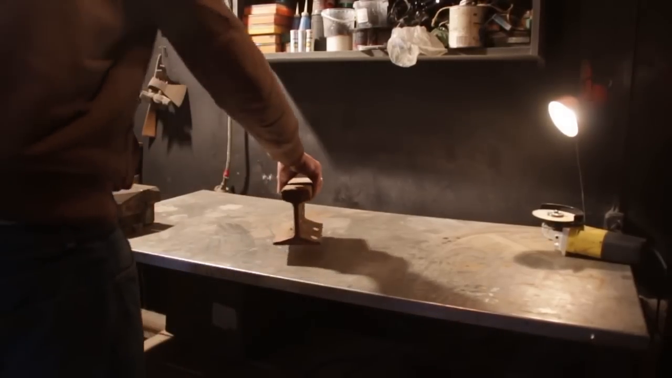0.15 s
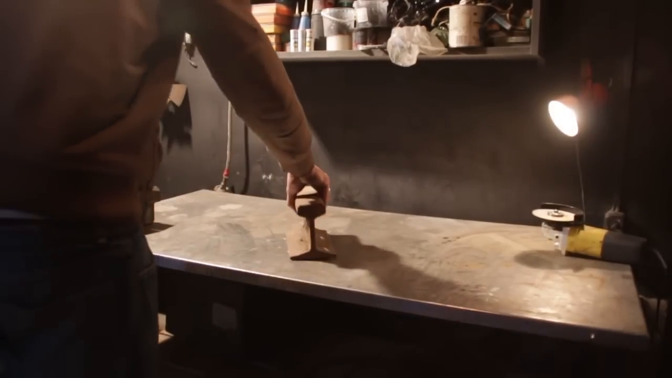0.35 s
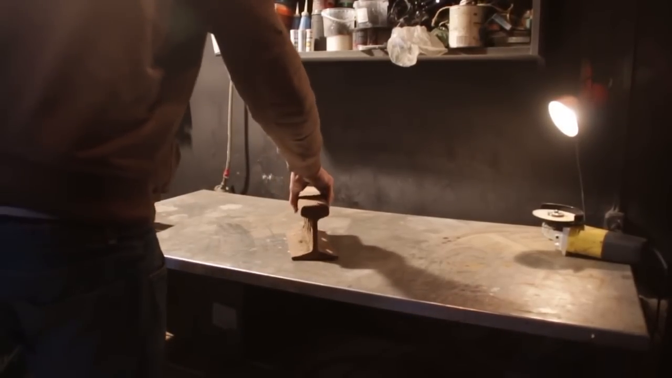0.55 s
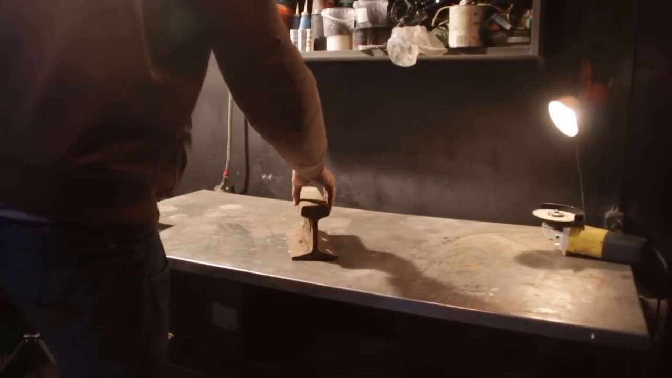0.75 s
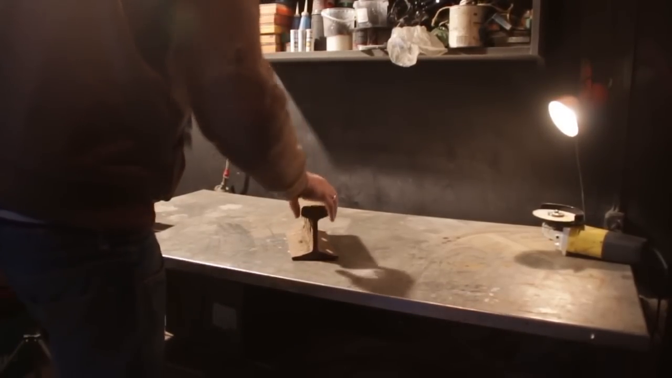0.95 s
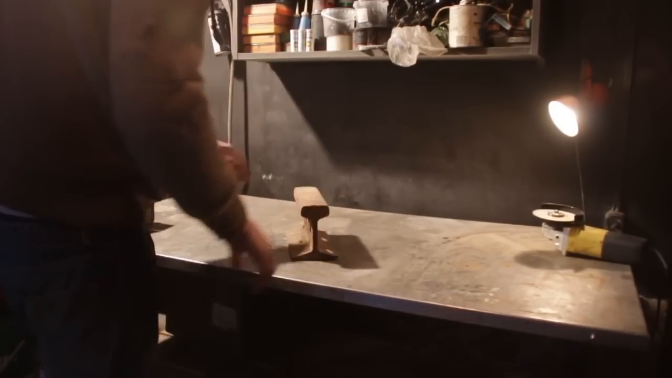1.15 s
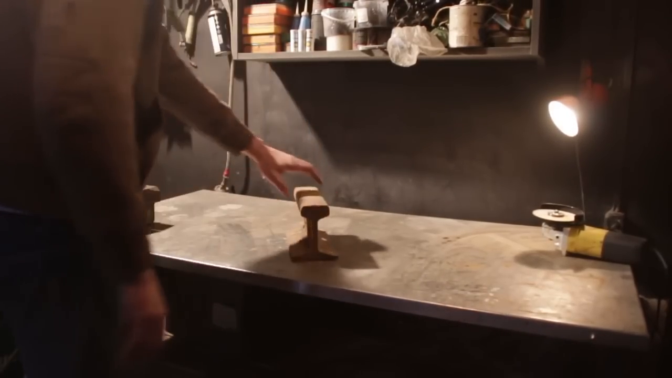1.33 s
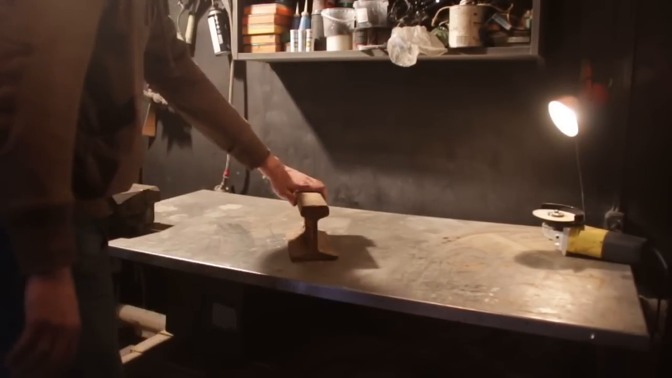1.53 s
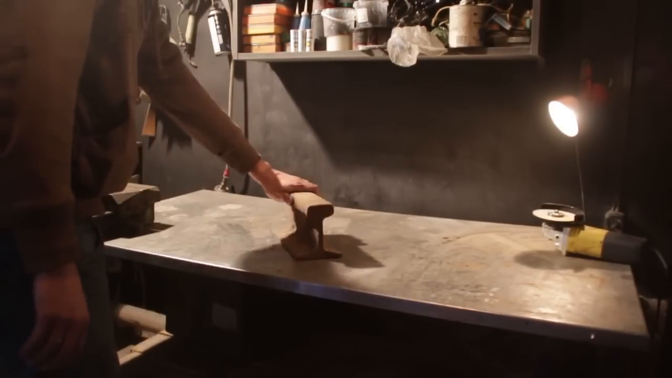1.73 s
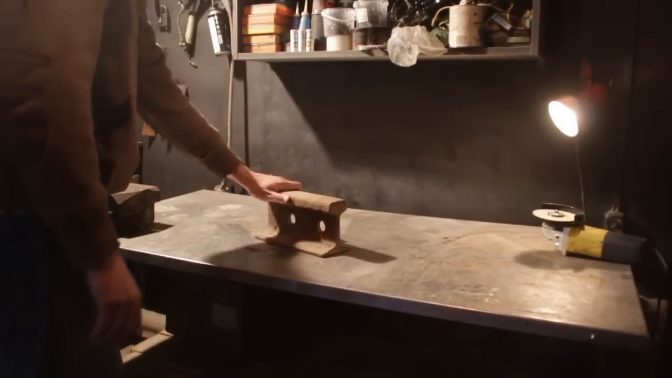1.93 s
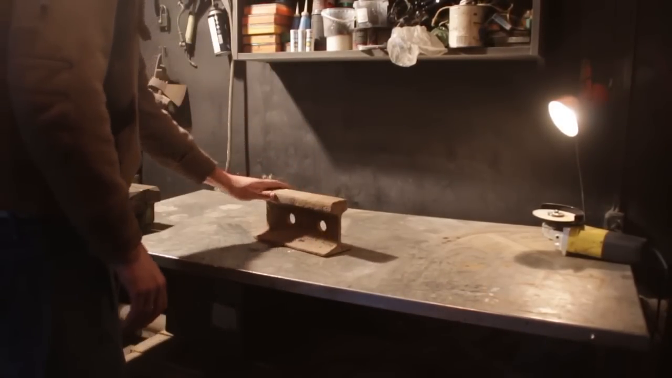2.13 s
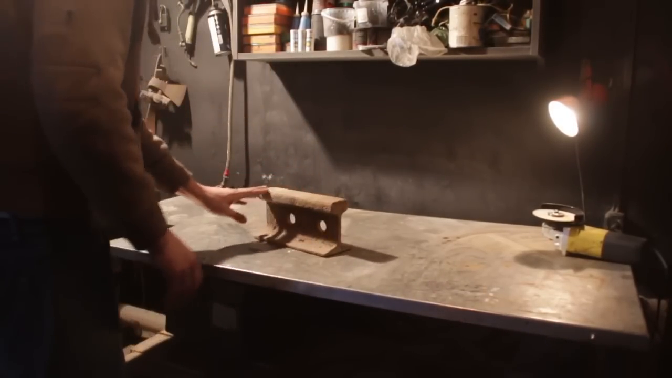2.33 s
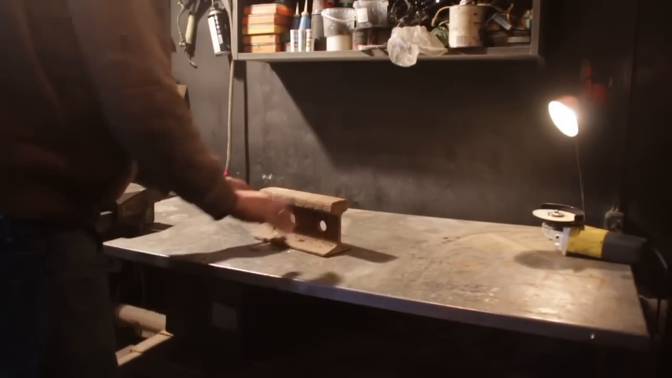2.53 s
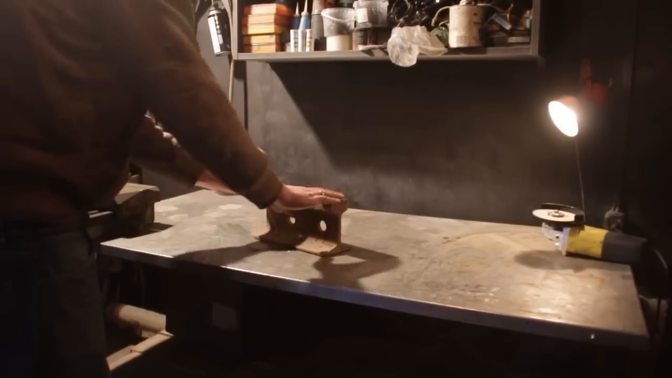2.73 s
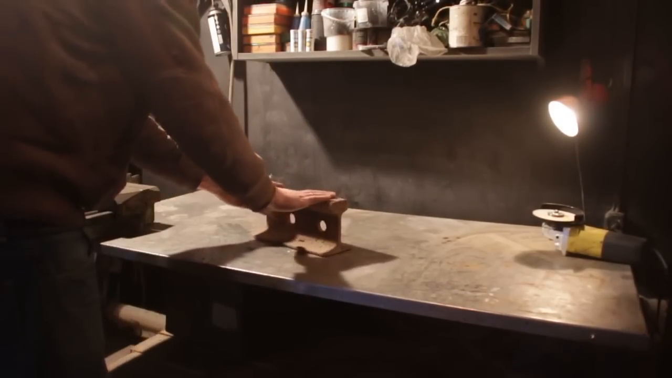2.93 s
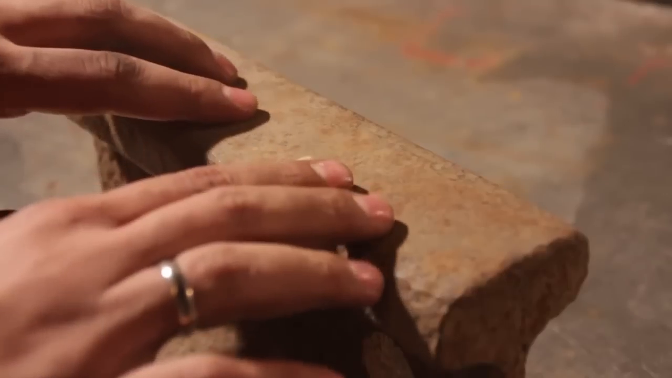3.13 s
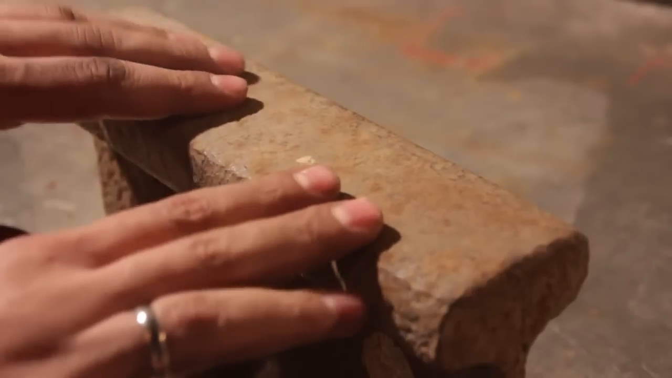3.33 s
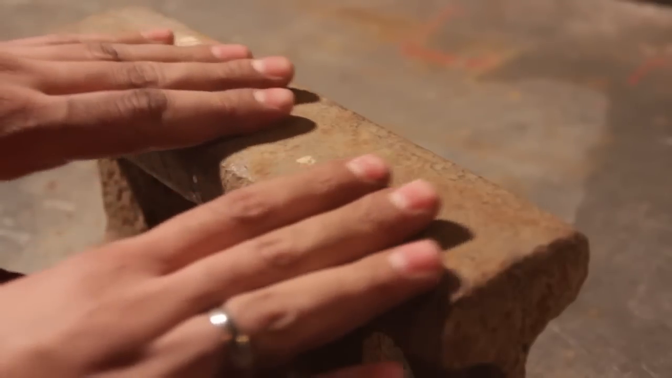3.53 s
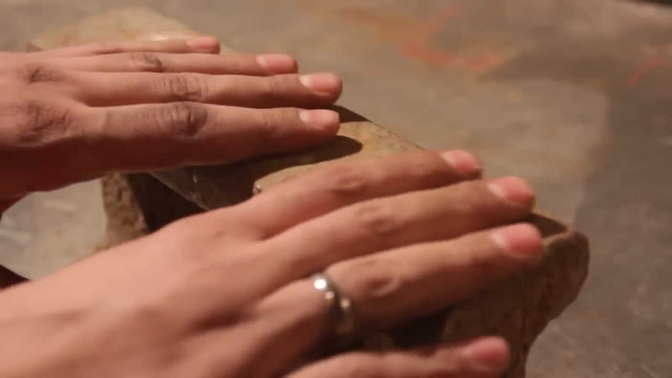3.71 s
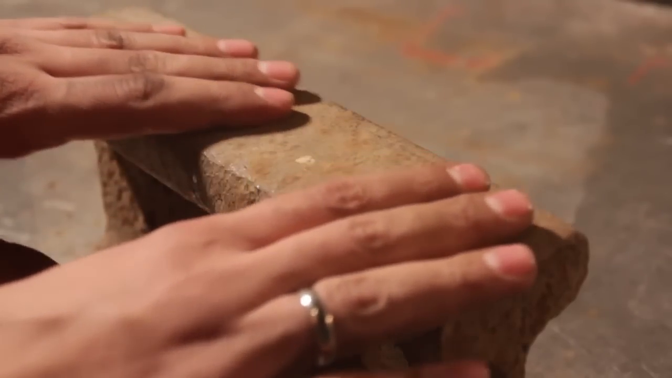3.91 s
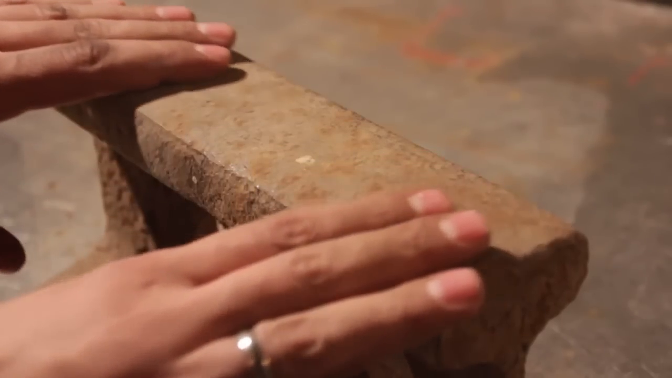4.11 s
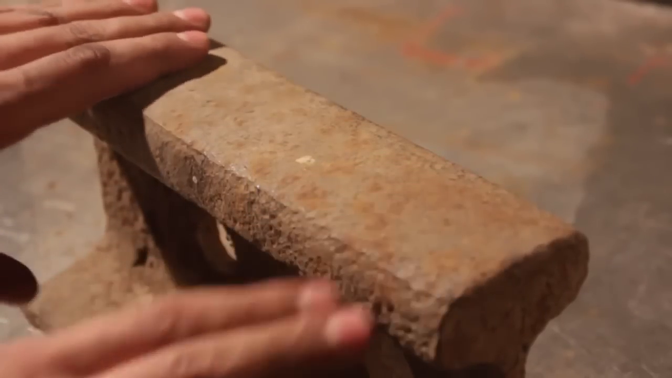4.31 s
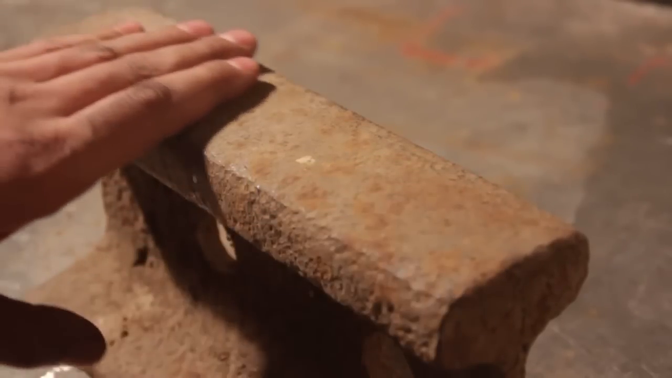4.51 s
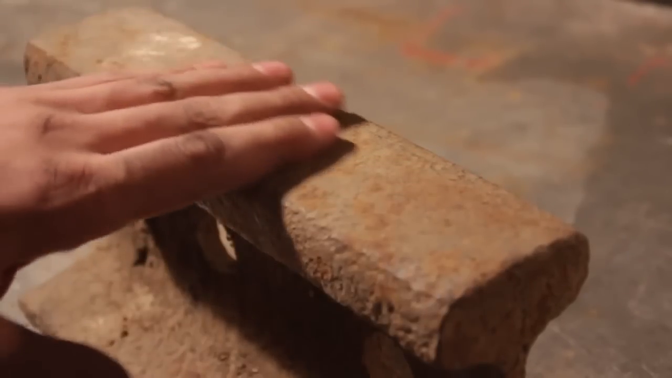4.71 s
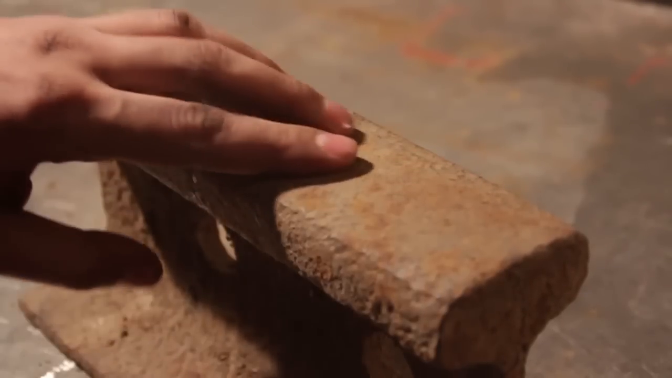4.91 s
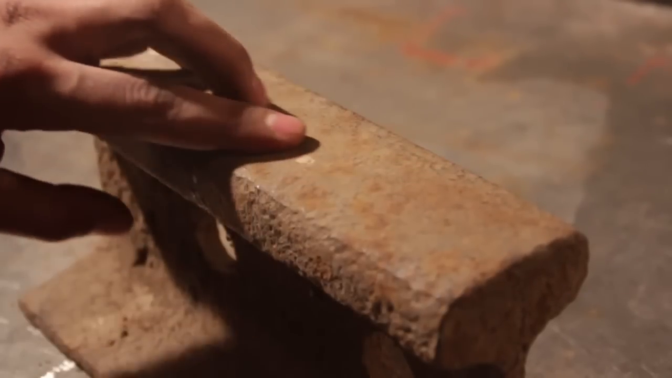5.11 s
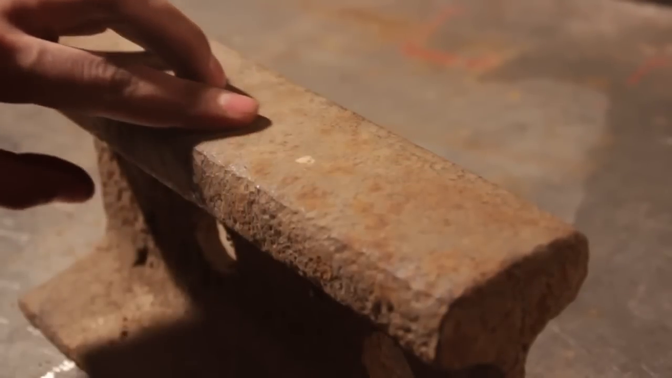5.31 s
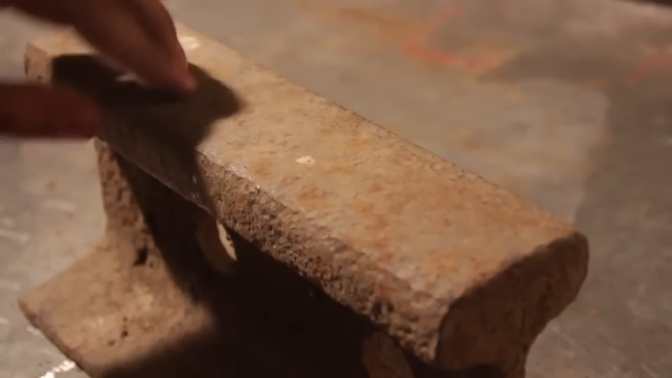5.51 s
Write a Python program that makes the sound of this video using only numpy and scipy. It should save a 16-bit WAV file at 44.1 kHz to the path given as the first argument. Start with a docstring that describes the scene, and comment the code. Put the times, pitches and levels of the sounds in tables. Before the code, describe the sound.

A heavy piece of steel rail scuffs and clangs onto a steel bench, rocks still, grinds round with a second clank, then palms brush its rusty top.

```python
"""Steel rail on a workbench

In a small workshop, a short length of rail scuffs a steel bench, drops with a clang and rocks to rest.
It is then turned round, grinding and knocking; afterwards two hands stroke its rusty head.
Blows and tiny friction contacts set off the ring of the bench. Short bands of noise, narrow or wide,
add chirps, groans, brushing rasps and faint rail ring. Palms hiss as shaped noise and make the rail sing
faintly. Sleeves and workshop air are steady soft noise.
"""
import sys
import numpy as np
from scipy import signal
from scipy.io import wavfile

SR = 44100
rng = np.random.default_rng(int(sys.argv[2]) if len(sys.argv) > 2 else 0)


def master_out(mix):
    """Clip the mix to full scale and print it as 16-bit PCM to the path in sys.argv[1]."""
    frames = np.transpose(np.atleast_2d(mix))
    ceiling = np.clip(frames, -1, 1)
    pcm = np.round(ceiling * 32767).astype(np.int16)
    wavfile.write(sys.argv[1], SR, pcm)


N = 244755
TIME = np.arange(N) / SR
RING_TIME = TIME[:3 * SR // 2]  # every ring is computed for 1.5 s
TURN_S = 1.5  # the hand takes hold of the rail to turn it


def from_db(db):
    """Turn decibels into gain."""
    return 10 ** (np.asarray(db) / 20)


def unit_rms(x):
    """Scale to an rms (average strength) of 1."""
    return x / np.sqrt(np.mean(x ** 2) + 1e-20)


def unit_energy(x):
    """Scale a response so that it keeps the power of white noise."""
    return unit_rms(x) / np.sqrt(x.shape[-1])


def at_hz(points, hz):
    """Read a table between its rows, on a log-frequency axis."""
    points = np.array(points)
    return np.interp(np.log(hz), np.log(points[:, 0]), points[:, 1])


def band(x, edges_hz, kind, order=2):
    """Keep part of the frequency range with a Butterworth filter."""
    sections = signal.butter(order, edges_hz, kind, fs=SR, output="sos")
    return signal.sosfilt(sections, x)


def convolve(force, response):
    """Let a force play through a stereo response."""
    return signal.fftconvolve(force[None], response, axes=1)[:, :N]


def stereo(mid, side, alike):
    """Mix two independent signals into two channels with the given correlation."""
    alike = np.clip(alike, -.99, .99)
    return np.sqrt(1 + alike) * mid + np.sqrt(1 - alike) * side * [[1], [-1]]


def noise_bands(spectrum, likeness, size):
    """Split stereo noise into third-octave bands, each given as (Hz, samples, gain)."""
    edges = 25 * 2 ** (np.arange(29) / 3)
    warm_up = 4000  # samples dropped while the filters settle
    white = rng.standard_normal((2, 2, size + warm_up))
    for k, (low, high) in enumerate(zip(edges, edges[1:])):
        # neighbouring bands use different noise
        mid, side = band(white[k % 2], [low, high], "band")[:, -size:]
        hz = np.sqrt(low * high)
        gain = from_db(at_hz(spectrum, hz)) * np.sqrt(high - low)
        yield hz, stereo(mid, side, at_hz(likeness, hz)), gain


def hiss(spectrum, likeness):
    """Add noise bands into a steady coloured stereo hiss of rms 1."""
    bands = noise_bands(spectrum, likeness, N)
    return unit_rms(sum(gain * unit_rms(pair) for hz, pair, gain in bands))


def dying(t60):
    """Fade that falls 60 dB in t60 seconds."""
    return np.exp(-np.log(1000) * RING_TIME / t60)


def ringing(modes, t60_of, spread):
    """Add fading tones; higher ones reach the channels further out of step."""
    # one channel runs ahead and the other behind, each by "spread" samples
    channel_time = RING_TIME + spread * np.array([[1], [-1]]) / SR
    out = 0
    for k, (hz, db) in enumerate(modes):
        wave = (-1) ** k * np.sin(2 * np.pi * hz * channel_time)
        out = out + from_db(db) * unit_energy(wave * dying(t60_of(hz)))
    return unit_energy(out)


# colour of the workshop air and of rustling cloth: (frequency [Hz], relative level [dB per Hz])
AIR_SPECTRUM = [(15, -51), (25, -16), (64, -5), (269, -6.5), (299, -7), (334, -5.5), (557, -7.5),
                (770, -10), (835, -8.5), (2210, -14.5), (2590, -15), (5380, -18), (15800, -32.5)]
CLOTH_SPECTRUM = [(40, -33), (90, -0.5), (180, -1.5), (350, -3.5), (600, -9.5), (1200, -15), (3000, -17),
                  (6500, -26)]
# how alike the two channels are, for the air and for hands and sleeves: (frequency [Hz], correlation [-1 to 1])
AIR_LIKENESS = [(50, 0.71), (200, -0.012), (700, 0.075), (2000, -0.29), (10000, -0.077)]
HAND_LIKENESS = [(150, 0.57), (500, 0.12), (2000, .1), (4200, 0.67), (8000, 0.39), (13000, .2)]


def background(air_db=-51, sleeve_db=-52.5, reach_s=3.03, rise_s=0.11):
    """Rub of cloth and steady air as shaped noise; sleeves join once both arms reach over the bench."""
    reach = np.clip((TIME - reach_s) / rise_s, 0, 1)
    sleeves = from_db(sleeve_db) * reach * hiss(CLOTH_SPECTRUM, HAND_LIKENESS)
    return sleeves + from_db(air_db) * hiss(AIR_SPECTRUM, AIR_LIKENESS)


# palms rubbing over rust: (start [s], length [s], relative strength [dB])
PALM_STROKES = [(2.15, 0.38, -53), (2.84, .13, -61), (2.995, 0.12, -45.5), (3.12, 0.24, -58),
                (3.50, 0.38, -51.5), (3.893, 0.46, -45), (4.312, .13, -56), (4.465, 0.21, -46.5),
                (4.622, 0.31, -45), (4.955, 0.74, -56)]


def rubbing(power=0.75):
    """Each stroke swells and fades with a power of the hand's speed, which follows a half sine."""
    out = np.zeros(N)
    for start, length, db in PALM_STROKES:
        on = (TIME > start) & (TIME < start + length)
        hand_speed = np.abs(np.sin(np.pi * (TIME[on] - start) / length))
        out[on] += from_db(db) * hand_speed ** power
    return out


# colour of skin on rust: (frequency [Hz], relative level [dB per Hz])
SKIN_SPECTRUM = [(800, -9.5), (2000, -4.5), (3000, -3), (4200, 0), (6000, -0.5), (8500, -3), (11000, -9.5),
                 (15500, -23)]
# the rail's own thin ring when rubbed: (frequency [Hz], relative level [dB])
RAIL_MODES = [(2832, -61.5), (3112, -67), (3564, -63), (4167, -65), (5405, -57), (6164, -91), (7418, -93),
              (9362, -81)]


def hands(rub_db=0.5, ring_db=-12.0, rail_t60=0.59, grain=0.081):
    """Skin hisses over rust, and its random rubbing force makes the rail sing faintly."""
    strength = rubbing()
    texture = np.exp(grain * unit_rms(band(rng.standard_normal(N), 190, "low")))
    rub = strength * texture * hiss(SKIN_SPECTRUM, HAND_LIKENESS)
    rail = ringing(RAIL_MODES, lambda hz: rail_t60, spread=0.76)
    ring = convolve(strength * rng.standard_normal(N), rail)
    return from_db(rub_db) * rub + from_db(ring_db) * ring


# where the rail lands, then where it is turned under the hand:
# (strong modes [dB], share of ring time, lowest judder [Hz], contact top [Hz])
PLACES = [(-8, 1, 390, 9100), (-5.5, 0.9, 250, 10200)]
# strongest modes of the bench under the rail:
# (frequency [Hz], relative level where it lands [dB], relative level where it is turned [dB])
BENCH_MODES = [(66.4, -10.5, -35), (111.1, -4, -7), (132, -6, -23), (161, 1.5, -39), (202.6, -0.5, -0.5),
               (215.3, -5.5, -13), (250, -5, -3.5), (292.2, -4, -6), (310.5, 1.5, -4), (309, -14, -10),
               (346, -8.5, -24), (400, -20, -1), (395.4, -23, -16), (454.7, -3.0, -6), (473.3, -2.5, -1),
               (510, -23, -2.5), (530, -2.5, 0.5), (583, -4.5, 0.5), (617, -7, -27), (624, -13, -7),
               (672.6, -3, -16), (865, -11, -8.5), (899, -7, -20), (1012, -5, -14), (1221, -5.5, -17),
               (1227, -19, -1.5), (1794, -0.5, -17), (1865, -40, -21), (1980, -19, -35), (2180, -12, -32)]
# the crowd of weaker plate modes: (frequency [Hz], relative level [dB per Hz])
PLATE_CROWD = [(30, -19), (65, -16), (88, -17.5), (120, -3), (300, -3), (560, -5.5), (760, -8),
               (1900, -5.5), (4000, -12), (6700, -19), (8400, -19), (10500, -24.5), (15500, -17.5)]
# time for the bench's ring to fall 60 dB, before the crowd's share: (frequency [Hz], ring time [s])
PLATE_T60 = [(60, 5.2), (115, 1.82), (450, 1.08), (1100, 1.035), (2900, 0.53), (8000, 0.44), (15000, 0.44)]
# how alike the two channels of the plate are: (frequency [Hz], correlation [-1 to 1])
PLATE_LIKENESS = [(100, 0.97), (500, 0.97), (1000, 0.92), (2100, 0.72), (4200, 0.49), (7500, 0.14),
                  (12000, -0.07)]
# broad resonances of the steel: (frequency [Hz], width [Hz], lift [dB])
STEEL_RESONANCES = [(1900, 250, 2), (2280, 200, 3), (3250, 400, 3), (8500, 1200, 6)]


def bench_response(place, lowest_hz=46, spread_s=0.0021):
    """The plate's ring in the room: a few strong modes among a dense crowd, highs mostly dying first."""
    modes_db, ring_share, _, top_hz = PLACES[place]
    crowd = 0
    for hz, pair, gain in noise_bands(PLATE_CROWD, PLATE_LIKENESS, len(RING_TIME)):
        fade = dying(ring_share * at_hz(PLATE_T60, hz))
        crowd = crowd + gain * unit_energy(pair * fade)
    for hz, width_hz, lift_db in STEEL_RESONANCES:
        peak = signal.lfilter(*signal.iirpeak(hz, hz / width_hz, SR), crowd)
        crowd = crowd + (from_db(lift_db) - 1) * peak
    place_modes = np.array(BENCH_MODES)[:, [0, 1 + place]]
    modes = ringing(place_modes, lambda hz: at_hz(PLATE_T60, hz), spread=1.55)
    # standing waves take a moment to fill the plate
    modes = modes * (1 - np.exp(-RING_TIME / spread_s))
    mix = unit_energy(crowd) + from_db(modes_db) * modes
    return band(mix, [lowest_hz, top_hz], "band", order=3)


def registers(response, low_hz=770, high_hz=4300):
    """Middle, low and high parts of a response: a flat contact stirs the lows, a corner the highs."""
    return [unit_energy(band(response, [low_hz, high_hz], "band", order=3)),
            unit_energy(band(response, low_hz, "low", order=4)),
            unit_energy(band(response, high_hz, "high", order=3))]


# short bands of noise, narrow or wide: chirps, groans, brushing rasps and faint rail ring:
# (middle [s], frequency [Hz], width [Hz], rms before the swell and fade [dB], length [s])
NOISE_PATCHES = [(0.25, 520, 200, -37, 0.024), (0.256, 1095, 90, -32.5, 0.025),
                 (0.276, 560, 67, -36, 0.018), (0.315, 400, 30, -36, 0.052), (0.3, 4036, 2500, -35, 0.15),
                 (0.337, 532, 50, -34, 0.044), (1.831, 318, 33, -26.5, 0.094), (1.888, 588, 57, -23.5, .07),
                 (1.939, 393.6, 26, -26, 0.12), (1.994, 518.6, 60, -26.5, .16),
                 (1.997, 1509, 150, -23.5, 0.035), (2.14, 119.5, 13.1, -36.5, .5),
                 (2.25, 514.6, 20, -36, 0.32), (2.381, 5280, 390, -57, 0.24), (2.452, 3880, 51, -59, 0.18),
                 (2.47, 8425, 184, -64, 0.28), (3.048, 4300, 1500, -47.5, 0.16),
                 (3.815, 5405, 50, -59.5, 0.26), (4.195, 4200, 450, -53, 0.19),
                 (4.387, 5560, 95, -61, 0.16), (4.651, 4180, 240, -50.5, 0.29)]


def chirps_and_rasps():
    """Short bands of noise that swell and fade: narrow ones sound like unsteady tones, wide ones rasp."""
    out = np.zeros((2, N))
    for s, hz, width_hz, db, length in NOISE_PATCHES:
        count = int(length * SR)
        start = round(s * SR) - count // 2
        # slow noise makes strength and phase wander; faster noise widens the band
        wander = band(rng.standard_normal((2, 2, SR // 2)), width_hz / 2, "low")
        real, imaginary = wander[..., -count:]
        carrier = np.exp(2j * np.pi * hz * TIME[:count])
        mid, side = np.real((real + 1j * imaginary) * carrier)
        patch = unit_rms(stereo(mid, side, at_hz(PLATE_LIKENESS, hz)))
        out[:, start:start + count] += from_db(db) * np.hanning(count) * patch
    return out


# the foot sliding on the plate; strengths are at the start, before rise and settling:
# (start [s], rise [s], length before release [s], grind [dB], judder [dB], grit [dB])
FOOT_SLIDES = [(0.231, 0.014, 0.11, -34, -39, -40.5), (0.471, 0.012, 0.28, -21, -22, -33),
               (0.793, 0.023, 0.21, -32.5, -28.5, -52), (1.001, .025, 0.062, -35.5, -37, -45.5),
               (1.207, 0.042, 0.078, -45, -39, -53), (1.507, 0.021, 0.081, -53, -45, -55),
               (1.653, 0.016, 0.052, -45.5, -47, -43), (1.686, 0.055, 0.088, -27.5, -30, -30.5),
               (1.781, 0.017, 0.068, -20.5, -31.5, -22), (1.839, .012, 0.25, -23, -21.5, -21)]
# a slide loses its bite as the foot settles flat: (grind [dB/s], judder [dB/s], grit [dB/s])
SETTLING = (26.5, 15, 53)


def sliding_force(uneven_db=1.0, uneven_hz=30, release_s=0.052):
    """Strength of grind, judder and grit: each slide catches, settles unevenly and stops."""
    out = np.zeros((3, N))
    for start, rise, length, *levels_db in FOOT_SLIDES:
        age = np.maximum(TIME - start, 0)
        release = np.clip(1 - (age - length) / release_s, 0, 1) ** 2
        gate = np.minimum(age / rise, 1) * release
        on = gate > 0
        settled_db = np.array(levels_db)[:, None] - np.outer(SETTLING, age[on])
        out[:, on] += gate[on] * from_db(settled_db)
    unevenness = unit_rms(band(rng.standard_normal(N), uneven_hz, "low"))
    return out * from_db(uneven_db * unevenness)


def grains(per_s, spread_db):
    """Random tiny contacts of uneven size, rms 1."""
    sizes_db = spread_db * np.minimum(rng.exponential(1, N), 4)
    sizes = from_db(sizes_db) * rng.choice([-1, 1], N)
    return unit_rms(sizes * (rng.random(N) < per_s / SR))


def slides(response, active, low_cut_hz, pressed_t60=0.45):
    """Rough steel catches and slips on the plate, whose ring the pressing foot shortens."""
    friction = grains(per_s=500, spread_db=3.8) * active
    damped = band(response, low_cut_hz, "high") * dying(pressed_t60)
    pairs = zip(sliding_force(), registers(damped))
    return sum(convolve(friction * strength, part) for strength, part in pairs)


def rocking(count=8, start_s=.80, gap_s=.075, loss_db_per_s=18.5):
    """The rail rocks to rest in dull, unevenly spaced bumps that die away, as rows like the blows."""
    first_db = np.array((-42, -25.5, -58))  # clang, thud, sharp edge at start_s
    after = gap_s * (np.arange(count) + rng.uniform(-.2, .2, count))
    return [(start_s + s, *(first_db - loss_db_per_s * s)) for s in after]


# the rail's foot striking the bench; levels are energy spread over 40 ms, before the crack's lift:
# (time [s], clang [dB], thud [dB], sharp edge [dB])
FOOT_BLOWS = [(0.468, -12, -13.5, -17), (0.513, -30, -25.5, -40), (0.558, -25.5, -21, -25.5),
              (0.612, -23.5, -28, -31), (0.644, -28.5, -40, -27.5), (0.688, -21.5, -13.5, -31.5),
              (0.742, -26, -23.5, -37), (0.897, -29, -34.5, -39), (1.024, -33, -32, -54),
              (1.768, -24.5, -35.5, -17), (1.846, -17, -22.5, -20.5), (1.927, -20.5, -35, -24.5),
              (1.978, -30, -20, -34), (2.020, -31.5, -27, -29.5), (2.088, -40, -25.5, -46)]


def blows(response, active, crack_db=-23.0, crack_s=0.0024, energy_s=.04):
    """Each landing sets the plate ringing, with a slight lift a few milliseconds in as the foot comes flat."""
    crack = 1 + from_db(crack_db) * RING_TIME / crack_s * np.exp(1 - RING_TIME / crack_s)
    parts, out = registers(response), np.zeros((2, N))
    for s, *levels_db in FOOT_BLOWS + rocking():
        start = round(s * SR)
        if active[start]:
            mix = sum(from_db(db) * part for db, part in zip(levels_db, parts))
            clang = mix * crack * np.sqrt(energy_s * SR)
            # the rocking rail loads the plate a little differently each time, which shifts its modes
            detune = rng.uniform(.992, 1.008)
            shifted = [np.interp(RING_TIME * detune, RING_TIME, side) for side in clang]
            out[:, start:start + len(RING_TIME)] += shifted
    return out


def scene():
    """The bench rings differently in each of the rail's two places."""
    steel = 0
    for place, active in enumerate([TIME < TURN_S, TIME >= TURN_S]):
        _, _, judder_hz, _ = PLACES[place]
        # blows and slides each draw their own crowd of weak modes
        struck = blows(bench_response(place), active)
        ground = slides(bench_response(place), active, judder_hz)
        steel = steel + struck + ground
    return steel + chirps_and_rasps() + hands() + background()


def record(dry, cutoff_hz=15800):
    """Round the loudest peaks and cut the top."""
    rounded = 1.3 * np.tanh(dry / 1.3)
    top_cut = signal.ellip(12, .1, 80, cutoff_hz, fs=SR, output="sos")
    return signal.sosfilt(top_cut, rounded)


dry = scene()
out = record(dry)
master_out(out)
```